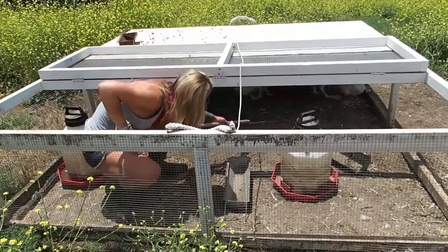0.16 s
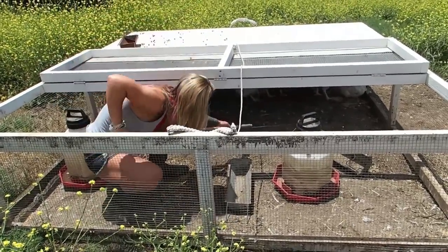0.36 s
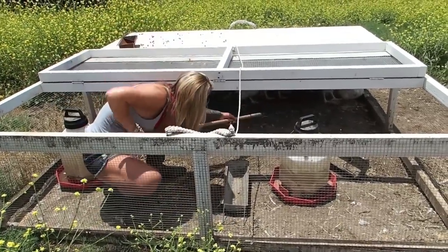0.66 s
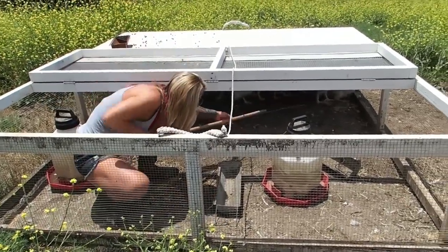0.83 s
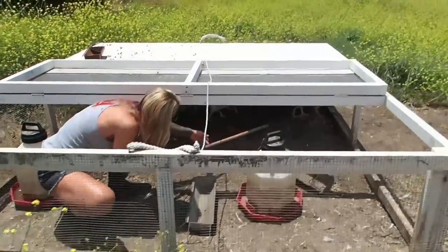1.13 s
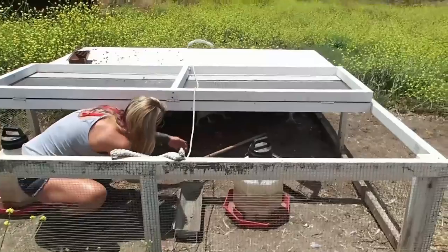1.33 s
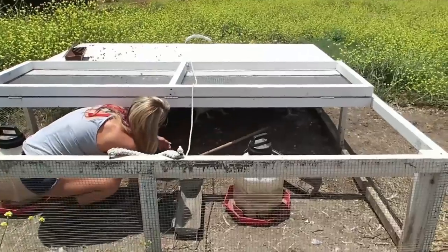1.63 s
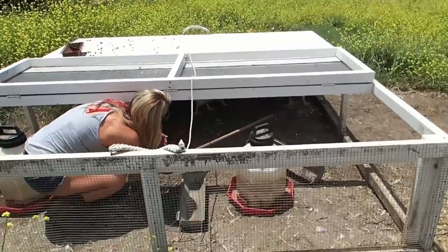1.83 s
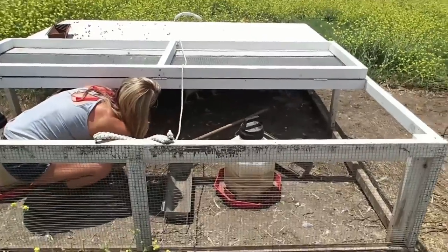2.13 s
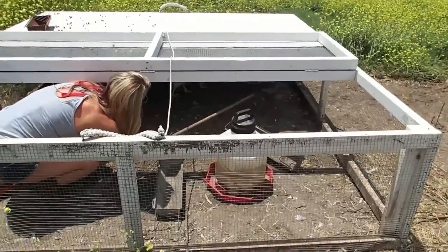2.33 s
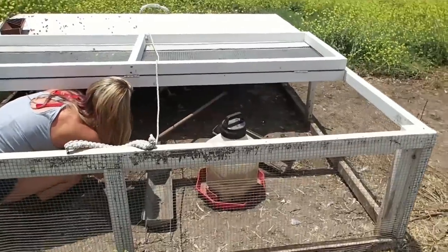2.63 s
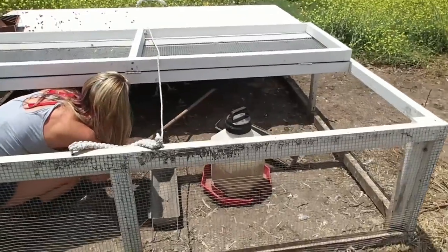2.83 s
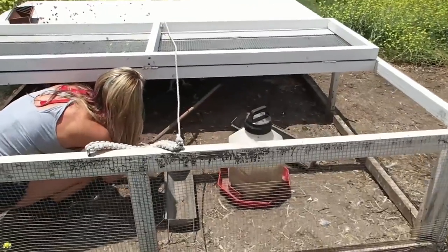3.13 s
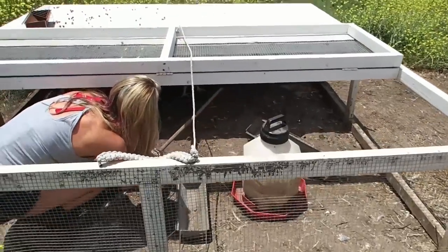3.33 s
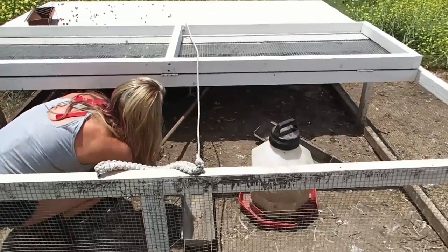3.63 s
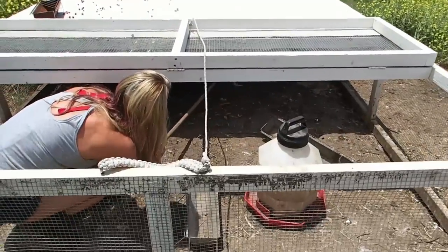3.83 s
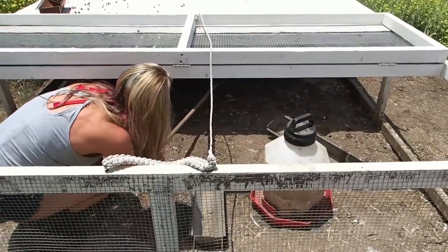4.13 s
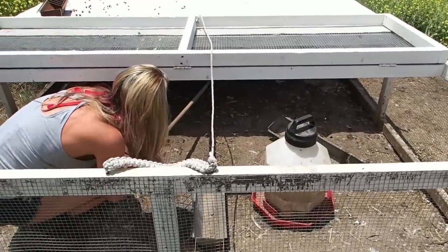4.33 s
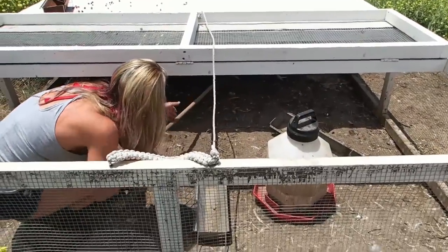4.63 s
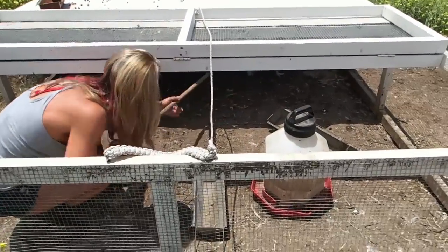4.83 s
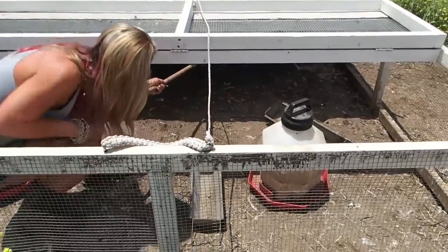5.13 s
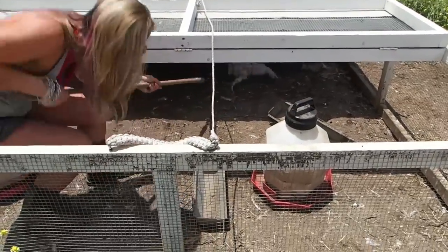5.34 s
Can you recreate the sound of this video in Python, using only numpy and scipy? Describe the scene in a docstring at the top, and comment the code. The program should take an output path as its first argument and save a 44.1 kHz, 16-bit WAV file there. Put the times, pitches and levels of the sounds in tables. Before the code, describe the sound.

Outdoors, wind rumbles softly on the microphone and dull bumps come and go as a stick drives young chickens along a wire pen. The birds keep up short falling peeps and low clucks over gritty shuffling. A burst of scuffs and a wire scrape come midway, then things settle until one chicken squawks three times amid sharp scuffling and rustling straw.

```python
"""Herding chickens in a wire pen

Outdoors, under a low roof, a stick knocks on the ground and drives young chickens along. They whistle
short falling peeps and cluck; one squawks three times as it flaps away, a slow membrane roughening its
voice. Friction on dry dirt, straw and wire makes grainy noise, and the microphone lifts the rustle near
5 kHz. Dull bumps and a low rumble of moving air lie underneath."""
import sys
import numpy as np
from scipy import signal
from scipy.fft import rfft, irfft, next_fast_len
from scipy.io import wavfile
from scipy.ndimage import map_coordinates

SR = 44100
rng = np.random.default_rng(int(sys.argv[2]) if len(sys.argv) > 2 else 0)


def dump_mix(stems):
    """Bounce the given channels to the path in sys.argv[1] as a 16-bit WAV at rate SR."""
    frames = np.atleast_2d(stems).T  # one column per channel
    limited = np.clip(frames, -1, 1)  # hard clip at full scale
    pcm = np.round(limited * 32767).astype(np.int16)
    wavfile.write(sys.argv[1], SR, pcm)


N = 241527

# Strength of the wind and of the birds' shuffling. Each row: time in seconds, level in dB.
WIND_LEVEL = [(0.0, -37.5), (0.14, -34), (0.44, -40.5), (1.07, -38), (1.25, -34), (3.14, -35),
              (3.44, -40.5), (4.08, -39), (4.52, -43.5), (4.86, -33.5), (5.15, -44), (5.47, -33)]
SHUFFLE_LEVEL = [(0, -36), (.52, -39.5), (1.8, -39), (2.28, -35), (2.47, -28.5), (2.8, -33.5),
                 (3.02, -31.5), (3.27, -36.5), (4.1, -38.5), (4.6, -35.5), (5.05, -34), (5.47, -32.5)]
# Long sweeps through dry straw. Each row: start in seconds, rise in seconds, level in dB.
SWISHES = [(2.82, 0.063, -39), (4.2, 1.33, -42.5)]
# Strokes on dirt. Each row: start in seconds, 60 dB decay time in seconds, level in dB.
STICK_TAPS = [(.06, .11, -23.5), (.381, .04, -30), (.93, .037, -28), (2.335, .13, -26), (2.587, .05, -24),
              (2.752, 0.13, -25), (3.013, 0.082, -25.5), (4.291, 0.077, -22), (4.495, 0.059, -24.5),
              (4.9, .26, -21.5), (5.167, .26, -23.5)]
BIRD_SCUFFS = [(2.149, .031, -25.5), (2.41, 0.15, -18.5), (2.491, 0.2, -23.5), (2.657, .11, -20.5),
               (2.693, 0.15, -14.5), (2.963, .1, -20.5), (3.635, .34, -28), (3.856, 0.096, -23.5),
               (4.393, .1, -24), (4.663, 0.072, -26.5), (4.755, .1, -27.5), (5.201, .066, -11),
               (5.23, 0.11, -26.5), (5.311, 0.087, -13), (5.373, .12, -19.5), (5.434, .12, -24)]
# Dull bumps. Each row: centre in seconds, level in dB, pitch in Hz.
BUMPS = [(.07, -10.5, 155), (.084, -8.5, 154), (.209, -10, 154), (.223, -5, 262), (.251, -7, 185),
         (.354, -10, 129), (.603, -15, 104), (.683, -12.5, 111), (.707, -10.5, 125), (1.132, -16, 111),
         (1.193, -12.5, 138), (1.21, -6, 159), (1.351, -12, 127), (1.488, -5.5, 139), (1.523, -7, 160),
         (1.656, -7, 138), (1.934, -15.5, 184), (2.011, -11, 162), (2.045, -10.5, 155), (2.256, -9.5, 141),
         (2.507, -11.5, 125), (2.961, -13.5, 135), (3.059, -13, 149), (3.861, -11, 130), (4.764, -8.5, 148),
         (4.815, -13, 165), (4.84, -7, 166), (4.857, -9, 160), (5.205, -11.5, 334)]
# Squawks and hoarse grumbles. Each row: start in seconds, length in seconds, pitch in Hz, level in dB,
# rasp from 0 to 1, pitch sag as a ratio, mid-note lift as a ratio.
SQUAWKS = [(.078, 0.026, 1300, -32.5, 0.85, 1, 1.05), (1.343, 0.029, 1081, -27, 0.86, 1, 0.99),
           (2.338, 0.027, 1126, -23, 1, 1, 1), (4.779, 0.025, 1610, -18, 0.73, 1, 1.28),
           (5.098, .036, 1614, -9, 0.12, 1, 1.04), (5.394, 0.026, 1770, -16, .9, 1.09, 0.96)]
# Whistled peeps. Each row: start in seconds, length in seconds, starting pitch in Hz, level in dB.
PEEPS = [(.201, .12, 2333, -34), (.279, 0.035, 3100, -35), (.4, .07, 2140, -37), (0.466, .033, 3560, -38.5),
         (.593, 0.081, 2550, -39), (.666, 0.079, 2133, -37.5), (0.752, 0.041, 3750, -39.5),
         (.825, 0.091, 2075, -38), (.935, 0.044, 2480, -32), (0.955, .048, 3780, -38),
         (1.082, .054, 2220, -39), (1.157, 0.057, 2330, -31), (1.353, 0.13, 2165, -33),
         (1.74, 0.1, 2130, -33.5), (1.951, 0.054, 2510, -30.5), (2.064, 0.068, 3200, -38.5),
         (2.781, .047, 2430, -37.5), (3.14, .084, 2730, -33), (3.218, .045, 2620, -27.5),
         (3.384, .075, 2840, -36), (3.594, .055, 2330, -36), (3.879, .1, 2674, -37),
         (4.089, .043, 2440, -35.5), (4.188, 0.067, 2565, -32), (4.378, .056, 3200, -34.5),
         (4.538, .039, 1780, -33.5), (4.87, .06, 2350, -32.5), (5.172, 0.024, 1680, -28.5)]
# Short low clucks. Each row: start in seconds, mid-note pitch in Hz, level in dB.
CLUCKS = [(.229, 1053, -35), (.296, 975, -32.5), (1.02, 1085, -28.5), (1.15, 1066, -32),
          (1.737, 1237, -31.5), (1.922, 1157, -32.5), (2.553, 1201, -22), (3.146, 1190, -29.5),
          (3.265, 1007, -32.5), (3.43, 1121, -27.5), (3.466, 1314, -31), (3.646, 1442, -28),
          (4.116, 1148, -33.5), (4.226, 1081, -29), (4.436, 1096, -30.5), (4.952, 1204, -31)]
# Scrapes and ticks on the wire. Each row: start in seconds, length in seconds, level in dB.
WIRE_SCRAPES = [(.521, 0.0046, -47), (1.041, .005, -44), (2.52, 0.038, -17.5), (2.613, 0.0072, -41),
                (4.334, 0.0055, -41), (5.201, 0.0087, -26.5), (5.318, 0.011, -29)]
# Spectral envelopes of the sources. Each row: frequency in Hz, gain in dB.
RUMBLE_SPECTRUM = [(18, -34), (32, -8.5), (65, 1.5), (150, -4.5), (300, -21), (1500, -71)]
SHUFFLE_SPECTRUM = [(100, -17.5), (420, -1), (700, -6), (2200, -8.5), (3400, -10), (4020, -14), (4500, -1),
                    (4900, 1), (5600, -10), (6800, -19.5), (15500, -35)]
STRAW_SPECTRUM = [(3000, -37), (6000, 0.5), (13500, -2.5), (15800, -4)]
DIRT_SPECTRUM = [(100, -18), (350, -3), (1050, -7), (1700, -11.5), (3300, -10), (4000, -12.5), (4700, 1),
                 (5200, -2.5), (5900, -12), (8000, -23.5), (15500, -40)]
SHUDDER_SPECTRUM = [(30, -8), (100, 2.5), (170, 3.5), (290, -13.5), (450, -20.5), (1000, -62)]
THROAT_SPECTRUM = [(500, -30), (1100, -1), (1600, 0.5), (2300, 2), (4000, 0.5), (4900, 8), (6000, -8),
                   (15000, -35)]
WIRE_SPECTRUM = [(3000, -50), (6500, -21), (8500, -16), (10500, -3), (12000, -9), (13500, -11),
                 (15500, -20)]
# Likeness of the noise in the two channels. Each row: frequency in Hz, correlation from 0 to 1.
COHERENCE = [(40, 0.46), (200, 0.36), (500, 0.75), (1000, 0.93), (5000, 0.9), (12000, 0.25)]
# Stereo balance. Each row: frequency in Hz, left minus right level in dB.
BALANCE = [(60, -1), (250, -1), (1500, -0.8), (5000, -1.5), (8500, -5), (15000, -9)]
# Reverberation of the pen. Each row: frequency in Hz, 60 dB decay time in seconds.
PEN_DECAY = [(200, 0.13), (2000, 0.14), (10000, 0.075)]


def amp(db):
    """Decibels as an amplitude ratio."""
    return 10 ** (np.asarray(db) / 20)


def unit(x):
    """A signal scaled to an rms of 1."""
    return x / np.sqrt(np.mean(x ** 2) + 1e-20)


def along(points, hz):
    """Interpolation of (Hz, value) points on a logarithmic frequency axis."""
    freqs, values = np.transpose(points)
    return np.interp(np.log(hz + 1), np.log(freqs + 1), values)


def wobble(rate, n):
    """A smooth random curve of n samples, with rate knots a second."""
    return map_coordinates(rng.standard_normal(int(n * rate / SR) + 4), [np.arange(n) * rate / SR])


def filtered(x, response):
    """Linear filtering: the spectrum is multiplied by a frequency response."""
    n = x.shape[-1]
    size = next_fast_len(n + 4096)
    return irfft(rfft(x, size) * response(np.fft.rfftfreq(size, 1 / SR)), size)[..., :n]


def add(track, start, x):
    """Superposition: x joins the track at a start time in seconds."""
    i = max(round(start * SR), 0)
    track[..., i:i + x.shape[-1]] += x[..., :max(N - i, 0)]


def grit(spectrum, n, grain_db, tilt_db=0):
    """Random modulation clumps stereo noise of rms 1 into millisecond grains; tilt_db is per octave."""
    angle = lambda hz: np.arccos(np.clip(along(COHERENCE, hz), -1, 1)) / 2
    colour = lambda hz: amp(along(spectrum, hz) + tilt_db * np.log2(np.maximum(hz, 500) / 4000))
    grains = rng.standard_normal((2, n)) * amp(grain_db * wobble(700, n))
    mid, side = filtered(grains, lambda hz: colour(hz) * [np.cos(angle(hz)), np.sin(angle(hz))])
    return unit(np.array([mid + side, mid - side]))


def slur(length, contour, rasp, waver=0.022, overtone_db=-17, flutter_db=3):
    """A whistle glides through three pitches; fast amplitude modulation broadens its line into a rasp."""
    n = int(max(length, .01) * SR)
    progress = np.linspace(0, 1, n)
    pitch = np.polyval(np.polyfit([0, .5, 1], contour, 2), progress)
    phase = 2 * np.pi * np.cumsum(pitch * (1 + waver * wobble(330, n))) / SR
    swell = np.abs(np.sin(np.pi * progress)) ** 0.42 * amp(flutter_db * unit(wobble(119.3, n)))
    tone = np.sin(phase) + amp(overtone_db) * np.sin(2 * phase)
    return swell * (1 + rasp * wobble(1398, n)) * tone


def air_rumble(wind_db, feet_db, swish):
    """Wind and the draughts of feet and sweeps add in power as they buffet the microphone."""
    air = np.linalg.norm([amp(wind_db + 4.4), amp(feet_db - .5), amp(2) * swish], axis=0)
    return air * amp(2.33 * wobble(25, N)) * grit(RUMBLE_SPECTRUM, N, grain_db=-1.5)


def shuffle(feet_db):
    """Many small contacts of feet on dirt merge into a flickering friction noise."""
    return amp(feet_db + 1.8 * wobble(45, N)) * grit(SHUFFLE_SPECTRUM, N, grain_db=1.5)


def swish_envelope(t, t60=1.6):
    """Each sweep through the straw grows linearly, then decays exponentially."""
    return sum(np.clip((t - start) / rise, 0, 1) * amp(db - 60 * np.maximum(t - start - rise, 0) / t60)
               for start, rise, db in SWISHES)


def straw(t, swish, growth_db_per_s=0.63):
    """Dry straw crackles more as the chase goes on; the sweeps add to it in power."""
    return np.hypot(amp(-55 + growth_db_per_s * t), swish) * grit(STRAW_SPECTRUM, N, grain_db=1.9)


def flock(calls=100):
    """Faint falling whistles, scattered in time and pitch, sum to the chatter of the birds behind."""
    out = np.zeros(N)
    for slot, (delay, height, stretch) in enumerate(rng.random((calls, 3))):
        hz = 1400 + 2000 * height
        start = (slot + delay) * N / SR / calls
        add(out, start, amp(-44) * slur(0.036 + .05 * stretch, [hz, .87 * hz, .72 * hz], rasp=0.29))
    return out


def dirt_stroke(t60, tilt_db):
    """Friction gathers loose grit, which settles exponentially; a slow stroke also swells slowly."""
    t = np.arange(SR // 3) / SR
    rise = 0.0032 + 0.033 * t60
    envelope = np.minimum(t / rise, 1) * amp(-60 * np.maximum(t - rise, 0) / t60)
    return envelope * grit(DIRT_SPECTRUM, len(t), grain_db=2, tilt_db=tilt_db)


def stick():
    """Impact and friction: the stick knocks and drags on the ground with little treble."""
    out = np.zeros((2, N))
    for start, t60, db in STICK_TAPS:
        add(out, start, amp(db) * dirt_stroke(t60, tilt_db=-2))
    return out


def bumps(width_cycles=0.64, offset_rad=0.6, shudder_s=0.017):
    """A low pressure pulse meets the two microphone ports out of phase, inside a short shudder."""
    out, t = np.zeros((2, N)), np.arange(-SR // 25, SR // 10) / SR
    for centre, db, hz in BUMPS:
        phase = rng.uniform(0, 2 * np.pi) + offset_rad * rng.choice([-1, 1]) * np.array([[1], [-1]])
        pulse = np.exp(-(t * hz / width_cycles) ** 2) * np.cos(2 * np.pi * hz * t + phase)
        shudder = np.exp(-np.abs(t - .008) / shudder_s) * grit(SHUDDER_SPECTRUM, len(t), grain_db=-2)
        add(out, centre + t[0], amp(db - 2) * (pulse + amp(-9) * shudder))
    return out


def squawk_stages(length, hz, db, rasp, sag, lift, catch_ratio=2.15):
    """The course of one cry. Each row: time from the note in seconds, pitch in Hz, level in dB, rasp."""
    edge_rasp = 0.44 * rasp
    return [(-.019, hz * catch_ratio, db - 19, 0.89),  # the voice catches high, weak and rough
            (-.005, hz * np.sqrt(catch_ratio), db - 19, 0.89),
            (0, hz * sag, db, edge_rasp),
            (length / 2, hz * lift, db - 4 * rasp, rasp),  # the rasp peaks and saps the level
            (length, hz / sag, db, edge_rasp),
            (length + .009, hz / sag * 0.91, db - 24, edge_rasp)]  # the pitch drops as it dies


def squawks(buzz_hz=340, buzz_depth=1.26, jitter=0.092):
    """Source and filter: a slower membrane modulates a forced whistle, and the throat colours it."""
    out = np.zeros(N)
    for start, *voice in SQUAWKS:
        times, *columns = np.transpose(squawk_stages(*voice))
        t = np.arange(times[0], times[-1], 1 / SR)
        n = len(t)
        pitch, db, rasp = [np.interp(t, times, column) for column in columns]
        buzz = np.sin(2 * np.pi * np.cumsum(buzz_hz * (1 + 0.1 * wobble(199, n))) / SR)
        phase = 2 * np.pi * np.cumsum(pitch * (1 + jitter * rasp * wobble(904, n))) / SR
        # the hard third harmonic gives way as the push of air runs out
        third = amp(np.linspace(-12, -32, n)) * (1 + .5 * wobble(474, n))
        tone = np.sin(phase) + amp(-26) * np.sin(2 * phase) + third * np.sin(3 * phase)
        breath = amp(-4) * np.sqrt(np.abs(rasp)) * rng.standard_normal(n)
        modulation = (1 + buzz_depth * rasp * buzz) / (1 + .5 * rasp)
        add(out, start + times[0], amp(db) * np.sqrt(2) * (tone + breath) * modulation)
    return filtered(out, lambda hz: amp(along(THROAT_SPECTRUM, hz)))


def peeps(easy_hz=2146, relax_share=.56, alarm_octaves_per_s=.068, calm_s=3.98):
    """Relaxation: a near bird's whistle slides towards its easy pitch, ending lower later in the chase."""
    out = np.zeros(N)
    for start, length, start_hz, db in PEEPS:
        end_hz = start_hz * (easy_hz / start_hz) ** relax_share * 2 ** (-alarm_octaves_per_s * start)
        # a harder push lifts the middle of a calm peep
        arch = 1 + 0.03 * (db + 41) * np.exp(-start / calm_s)
        contour = [start_hz, arch * (start_hz + end_hz) / 2, end_hz]
        add(out, start, amp(db - 1.2) * slur(length, contour, rasp=0.34, waver=.014, overtone_db=-15))
    return out


def clucks(length=0.0311):
    """A steep frequency glide settles on a low, slightly hoarse note."""
    out = np.zeros(N)
    for start, hz, db in CLUCKS:
        call = slur(length, [1.3 * hz, hz, 0.88 * hz], rasp=.36, waver=0.03, overtone_db=-12)
        add(out, start, amp(db - 0.14) * call)
    return out


def wire_mesh(attack_s=0.0015, t60=0.032):
    """Sliding friction excites the wire, which sings brightly during contact and then dies away."""
    out, t = np.zeros((2, N)), np.arange(SR // 8) / SR
    for start, length, db in WIRE_SCRAPES:
        slide = np.minimum(t / attack_s, 1) * amp(-60 * np.maximum(t - length + attack_s, 0) / t60)
        add(out, start, amp(db) * slide * grit(WIRE_SPECTRUM, len(t), grain_db=1))
    return out


def scuffs():
    """Friction of feet and wings on dirt: the harder the stroke, the more body its spectrum has."""
    out = np.zeros((2, N))
    for start, t60, db in BIRD_SCUFFS:
        add(out, start, amp(db) * dirt_stroke(t60, tilt_db=2.7 - 0.09 * (db + 22)))
    return out


def pen_echo(x):
    """Scattering between the low roof and the ground gives a short, diffuse reverberation."""
    hz, t, spectra = signal.stft(rng.standard_normal(SR // 4), SR, nperseg=256)
    decay = amp(-60 * t / along(PEN_DECAY, hz)[:, None])
    tail = signal.istft(spectra * decay, SR, nperseg=256)[1]
    response = np.pad(tail, (SR // 300, 0)) / np.linalg.norm(tail)
    return signal.fftconvolve(x, response)[:N]


def scene():
    """The sources superpose; the voices echo under the roof and the treble lies mostly to the right."""
    t = np.arange(N) / SR
    wind_db = np.interp(t, *np.transpose(WIND_LEVEL))
    feet_db = np.interp(t, *np.transpose(SHUFFLE_LEVEL))
    swish = swish_envelope(t)
    chatter, cries = peeps() + flock() + clucks(), squawks()
    birds = chatter + cries + pen_echo(amp(-9) * chatter + amp(-19.5) * cries)
    background = air_rumble(wind_db, feet_db, swish) + shuffle(feet_db)
    crackle = straw(t, swish) * amp([[-1.5], [1.5]])
    mix = birds + background + scuffs() + stick() + wire_mesh() + bumps()
    return filtered(mix, lambda hz: amp(along(BALANCE, hz) * np.array([[.5], [-.5]]))) + crackle


def record(dry, cutoff_hz=15900):
    """Band limiting: an ideal low-pass filter removes everything above the cutoff."""
    return filtered(dry, lambda hz: hz < cutoff_hz)


dry = scene()
out = record(dry)
dump_mix(out)
```